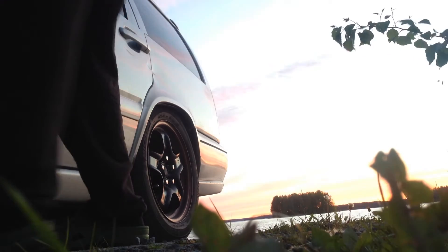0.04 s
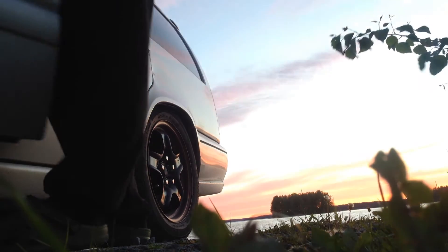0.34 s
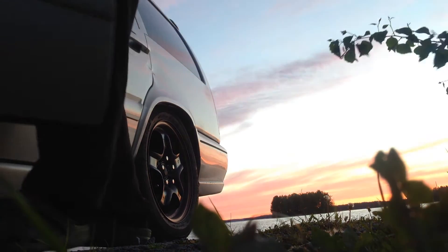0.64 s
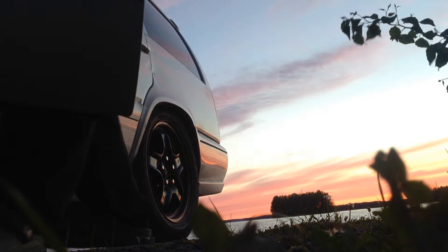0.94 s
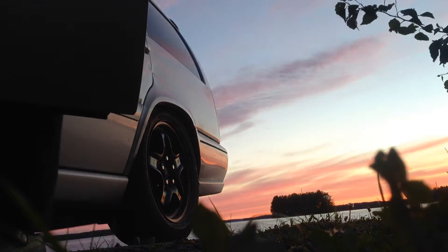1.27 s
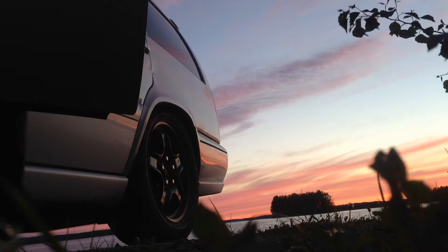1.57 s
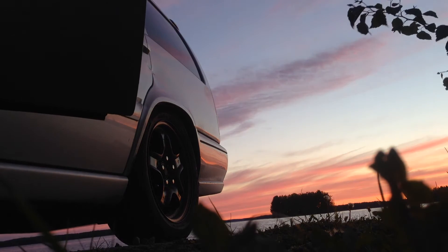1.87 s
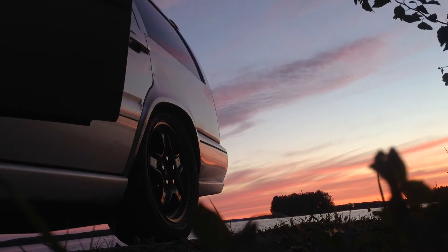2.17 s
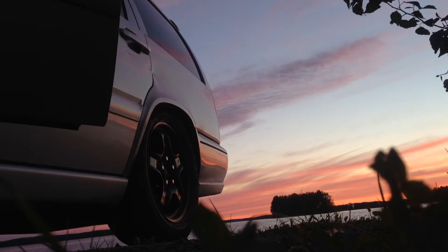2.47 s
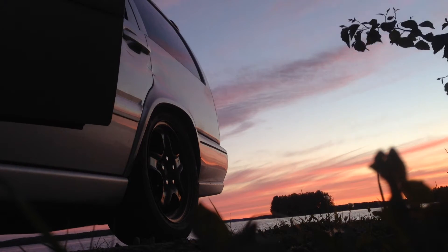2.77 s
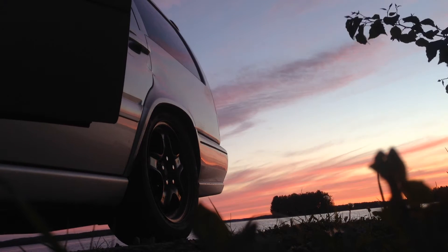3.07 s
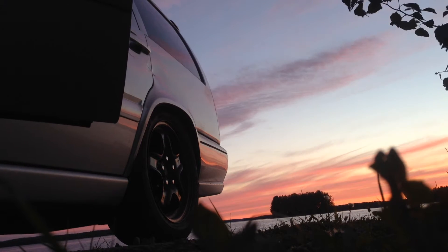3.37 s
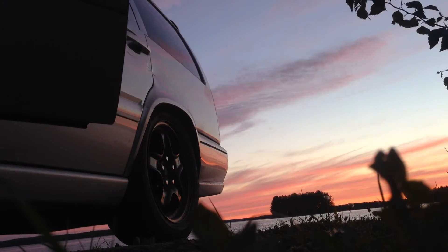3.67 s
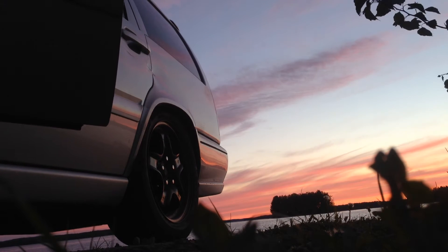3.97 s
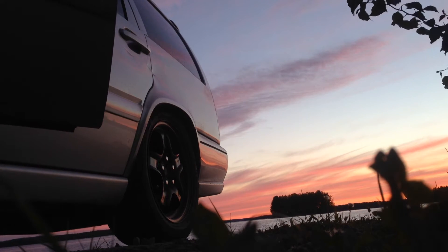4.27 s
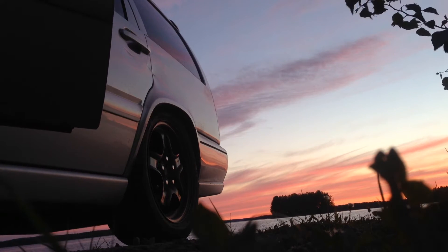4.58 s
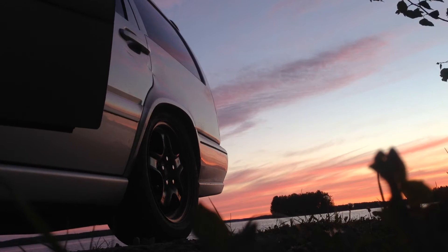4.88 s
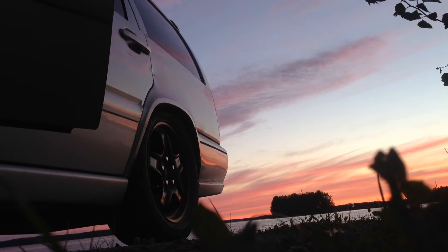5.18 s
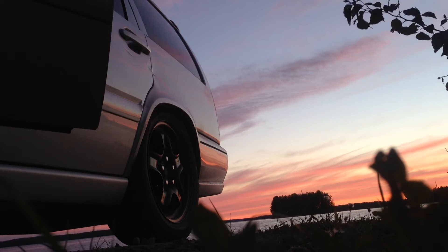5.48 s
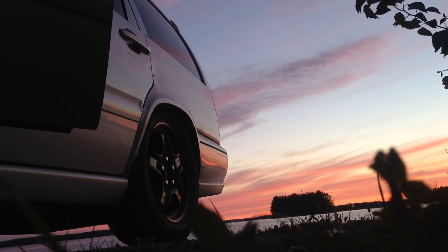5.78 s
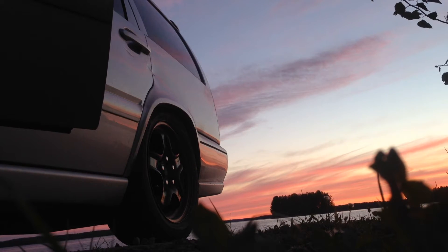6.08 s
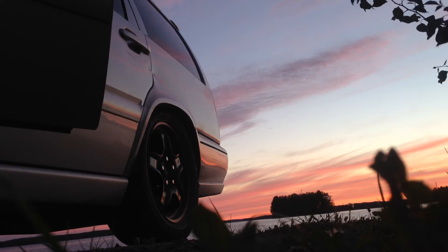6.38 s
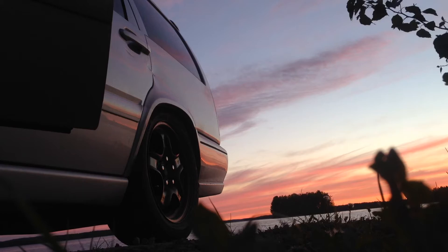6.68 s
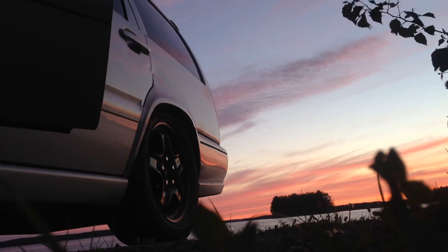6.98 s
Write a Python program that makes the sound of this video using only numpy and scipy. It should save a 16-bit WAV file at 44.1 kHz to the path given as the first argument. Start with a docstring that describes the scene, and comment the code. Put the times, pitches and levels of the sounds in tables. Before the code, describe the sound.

A diesel car idles outdoors with a low, uneven rumble and rattle, then is revved twice, the second time harder.

```python
"""A five-cylinder diesel car idles outdoors, heard from the ground beside it, and is revved twice.
The exhaust rumbles unevenly once a cycle and turns to a hard firing note under load.
Combustion knock, valve rattle and intake hiss ride on top, all following one crank and one pedal.
A few small clicks come from the door, over quiet outdoor air. Gain control ducks the loud revs."""
import sys
import numpy as np
from scipy import signal
from scipy.fft import rfft, irfft
from scipy.io import wavfile
from scipy.ndimage import uniform_filter1d

SR = 44100
rng = np.random.default_rng(int(sys.argv[2]) if len(sys.argv) > 2 else 0)


def put_to_file(sound):
    """Save the sound as 16-bit audio at rate SR, in the file named by the first command-line argument."""
    columns = np.atleast_2d(sound).T  # one column per channel
    safe = np.clip(columns, -1, 1)
    whole_steps = np.round(safe * 32767)
    wavfile.write(sys.argv[1], SR, whole_steps.astype(np.int16))


N = 310023
TIME = np.arange(N) / SR
CYLINDER_COUNT, IDLE_RPM = 5, 810


def gain_of(db):
    """Decibels to amplitude."""
    return 10 ** (np.asarray(db) / 20)


def unit_rms(x):
    """Scales to rms 1."""
    return x / np.sqrt(np.mean(x ** 2) + 1e-20)


def steadied(x, size=9001):
    """Scales to a running rms of 1, leaving the beat of single strokes."""
    power = uniform_filter1d(uniform_filter1d(x ** 2, size), size // 2)
    return x / np.sqrt(abs(power) + 1e-20)


def smoothed(x, lag_s):
    """One-pole lag."""
    keep = np.exp(-1 / (lag_s * SR))
    return signal.lfilter([1 - keep], [1, -keep], x)


def coloured(x, spectrum):
    """Minimum-phase filter through (Hz, dB) points, falling steeply above the last."""
    bins_hz = np.fft.rfftfreq(16384, 1 / SR)
    hz, db = np.transpose(spectrum)
    db = np.interp(np.log(bins_hz + 1), np.log(hz), db) - 40 * np.log2(np.maximum(bins_hz / hz[-1], 1))
    cepstrum = irfft(np.log(gain_of(np.maximum(db, -100))))
    cepstrum[1:len(bins_hz) - 1] *= 2
    cepstrum[len(bins_hz):] = 0
    response = irfft(np.exp(rfft(cepstrum)))[:len(bins_hz) // 2]
    return signal.oaconvolve(x, response)[:N]


def drift(hz, step=32):
    """Random wander of rms 1, rolling off near hz."""
    coarse = rng.standard_normal(N // step + 2)
    lowpass = np.exp(-(np.fft.rfftfreq(len(coarse), step / SR) / hz) ** 2)
    slow = irfft(rfft(coarse) * lowpass, len(coarse))
    return np.interp(np.arange(N) / step, np.arange(len(slow)), unit_rms(slow))


def decaying(clicks, t60_s):
    """Exponential tail after each click."""
    return signal.lfilter([1], [1, -np.exp(-np.log(1000) / (t60_s * SR))], clicks)


def ringing(clicks, modes):
    """Clicks strike modes given as (Hz, dB, t60 in s)."""
    t = TIME[:SR // 3]
    response = sum(gain_of(db - 60 * t / t60) * np.sin(2 * np.pi * hz * t) for hz, db, t60 in modes)
    return signal.oaconvolve(clicks, response)[:N]


def strokes(cycles, place):
    """One unit click each time the cycle passes this place."""
    return np.diff(np.floor(cycles - place), prepend=np.floor(cycles[0] - place))


def firings(cycles, lag=0):
    """One click train a cylinder, evenly spaced through the cycle."""
    return [strokes(cycles, k / CYLINDER_COUNT + lag) for k in range(CYLINDER_COUNT)]


# Crank speed. Each row: time in seconds, speed in rpm.
CRANK_SPEED = [(4.77, 809.9), (5.0, 937.9), (5.17, 981.1), (5.42, 1102.4), (5.76, 1723.6), (6.0, 1781.2),
               (6.37, 1646.6), (6.52, 2094.9), (6.7, 2770.1), (6.85, 2988.1), (7.03, 2920.8)]

def rpm():
    """Crank speed, at idle until the first row."""
    return np.interp(TIME, *np.transpose(CRANK_SPEED))


def crank_cycles():
    """Engine cycles (two turns each) done so far, with slight flutter."""
    return np.cumsum(rpm()) / SR / 120 - .015 + .0012 * drift(7)


# Pedal travel. Each row: time in seconds, throttle from 0 to 1.
PEDAL = [(4.77, 0.13), (4.87, 0.27), (5.24, 0.18), (5.4, 0.29), (5.54, 0.54), (5.68, 0.87), (5.76, 0.72),
         (5.85, 0.64), (5.92, 0.38), (6.29, 0.15), (6.36, 0.39), (6.41, 0.98), (6.66, 0.99), (6.8, 0.72),
         (7.03, 0.7)]

def throttle():
    """A light touch, a first rev, a lift, a hard second rev."""
    return np.interp(TIME, *np.transpose(PEDAL))


def effort(base_db, throttle_db, octave_db):
    """Gain law: base level, plus dB at full throttle, plus dB per doubling of idle speed."""
    return gain_of(base_db + throttle_db * throttle() + octave_db * np.log2(rpm() / IDLE_RPM))


# Outdoor air spectrum. Each row: frequency in Hz, relative level in dB.
AIR_SPECTRUM = [(20, -56), (60, -14), (150, 8.5), (400, -10.5), (1000, -0.5), (4000, -25.5), (15000, -84)]

def outdoor_air():
    """Quiet, steady, low noise."""
    return gain_of(-43) * unit_rms(coloured(rng.standard_normal(N), AIR_SPECTRUM))


# Door trim clicks. Each row: start in seconds, level in dB, centre in Hz, t60 in seconds.
DOOR_CLICKS = [(0.245, -46, 7000, 0.0064), (.311, -52, 5000, .05), (0.434, -46, 4000, .02),
               (1.598, -41, 4200, .07), (2.264, -48, 4500, 0.36), (2.298, -44, 5460, 0.08),
               (2.318, -41, 5340, 0.075), (3.444, -30.5, 4544, 0.0077), (4, -37, 3700, 0.011)]

def door_clicks():
    """Short dry ticks and scuffs of trim."""
    out = np.zeros(N)
    for start_s, db, hz, t60_s in DOOR_CLICKS:
        band = [(hz / 3, -14), (hz, 0), (hz * 2, -12), (hz * 4, -18)]
        noise = unit_rms(coloured(rng.standard_normal(N), band))
        fall_db = 60 * np.minimum(abs(TIME - start_s) / t60_s, 2)
        out += (TIME >= start_s) * gain_of(db - fall_db) * noise
    return out


def underbody_echoes(x, size=0.078, count=30):
    """Short echoes between underbody and ground ripple the spectrum."""
    taps = np.zeros(SR // 40)
    delays = rng.integers(40, len(taps), count)
    taps[delays] = size * rng.choice([-1, 1], count) * np.exp(-delays / len(taps))
    taps[0] = 1
    return signal.oaconvolve(x, taps / np.linalg.norm(taps))[:N]


# Intake spectrum. Each row: frequency in Hz, relative level in dB.
INTAKE_SPECTRUM = [(2180, -1), (3700, 5), (4370, -3), (5000, 0), (5560, 0.5), (6290, -0.5), (7170, -0.5),
                   (9460, -2), (12400, -10), (14300, -14), (15200, -21)]
# Gain law: base in dB, dB at full throttle, dB per speed octave.
INTAKE_GAIN = (-53, 9.2, 4.53)

def intake_hiss(cycles, revved, fast, off_idle_db=4, snort_db=4, snort_s=6.445, snort_width_s=0.024):
    """Intake air pulses, whistles faintly and snorts as the pedal is floored; injectors tick through."""
    beats = strokes(CYLINDER_COUNT * cycles, 0.44)
    ticks = decaying(beats * gain_of(4.8 * drift(40) - 27), .005)
    flow = 1 + 0.89 * decaying(beats, 0.089) + 1.5 * ticks
    air = steadied(coloured(flow * rng.standard_normal(N), INTAKE_SPECTRUM))
    air += 0.42 * revved * np.diff(air, prepend=0)  # faster air is brighter
    whistle_hz = 6330 + 950 * fast * throttle() ** 2
    whistle = unit_rms(drift(200) * np.cos(2 * np.pi * np.cumsum(whistle_hz) / SR))
    air += gain_of(-13 + 7 * throttle()) * whistle
    snort = np.exp(-((TIME - snort_s) / snort_width_s) ** 2)
    return effort(*INTAKE_GAIN) * gain_of(off_idle_db * revved + snort_db * snort + .5 * drift(56)) * air


# Valve spectra at low and high speed. Each row: frequency in Hz, relative level in dB.
VALVES_SLOW = [(1240, -36.5), (2100, -5), (2270, 1), (2470, 1.5), (2610, 6), (2870, 2.5), (3260, 0.5),
               (3470, -0.5), (3560, -21), (4000, -14), (5200, -47), (8800, -120)]
VALVES_FAST = [(1240, -32), (2100, -4.5), (2280, -3.5), (3060, -2), (4000, -22.5), (5200, -33),
               (8800, -120)]
# Valve cover modes. Each row: frequency in Hz, relative level in dB, t60 in seconds.
COVER_RING = [(2534, 11, 0.039), (2600, -18, 0.018), (2562, -8, .04), (2980, 4, 0.023)]
# Gain law: base in dB, dB at full throttle, dB per speed octave.
VALVE_GAIN = (-44, 11.6, 5.7)

def valve_rattle(cycles, fast):
    """Valves and injection pump chatter ten times a cycle and ring the valve cover."""
    taps = strokes(2 * CYLINDER_COUNT * cycles, 0.11) * gain_of(4.9 * np.minimum(drift(115), 2))
    chatter = (0.98 + decaying(taps, 0.028)) * rng.standard_normal(N)
    cover = gain_of(-3) * unit_rms(ringing(chatter, COVER_RING))
    low_speed = unit_rms(coloured(chatter, VALVES_SLOW)) + cover
    high_speed = unit_rms(coloured(chatter, VALVES_FAST))
    return effort(*VALVE_GAIN) * steadied((1 - fast) * low_speed + fast * high_speed)


# Cylinder strengths, also used by the exhaust. Each row: exhaust pulse, knock, injector ping, in dB.
CYLINDER_DB = [(-7.5, 5, -10.5), (-25, 1, -9), (-10.5, 3.5, -10.5), (0.5, 5.5, -25), (-1.5, 0.5, -3.5)]
# Block spectra at idle and revved. Each row: frequency in Hz, relative level in dB.
BLOCK_IDLE = [(250, -6.5), (430, -25), (452, -5), (478, -15), (523, -3.5), (797, -8.5), (820, -12.5),
              (892, -9.5), (944, -2.5), (1090, -12.5), (1210, -9.5), (1410, -4), (1740, -8), (1930, -8.5),
              (2300, -14), (2990, -23), (5060, -120)]
BLOCK_REVVED = [(260, -23.5), (450, 0), (560, -2.5), (620, -5.5), (843, -7), (973, -3), (1090, -7),
                (1310, -2), (1560, -7.5), (1870, -4.5), (2300, -16.5), (2990, -59), (5060, -120)]
# Block modes. Each row: frequency in Hz, relative level in dB, t60 in seconds.
BLOCK_RING = [(844, -17, .4), (977, -8, .12), (1182, -9, .12), (1687, -7, .12), (2050, -13, .1)]
# Gain law: base in dB, dB at full throttle, dB per speed octave.
KNOCK_GAIN = (-38, 10.3, 5.2)

def combustion_knock(cycles, revved, clack_rise_s=0.002, clack_t60_s=0.081):
    """Each ignition strikes the block: rough burst, the cylinder's own clack, injector ping, ringing."""
    _, knock_sizes, ping_sizes = gain_of(CYLINDER_DB).T
    trains = np.array([train * gain_of(.7 * drift(20)) for train in firings(cycles, lag=.1)])
    blows, pings = knock_sizes @ trains, ping_sizes @ trains
    t = TIME[:SR // 20]
    envelope = gain_of(-60 * t / clack_t60_s) * (1 - np.exp(-t / clack_rise_s))
    clacks = sum(size * signal.oaconvolve(train, envelope * rng.standard_normal(len(t)))[:N]
                 for size, train in zip(knock_sizes, trains))
    burst = (1 + 2 * uniform_filter1d(decaying(blows, 0.21), size=240)) * rng.standard_normal(N)
    # two coupled modes: the ping swells briefly
    ping = ringing(ringing(pings, [(1198, 0, 0.018)]), [(1142, 0, 0.0095)])
    idle = gain_of(-3) * steadied(coloured(burst, BLOCK_IDLE))
    idle += gain_of(-8) * steadied(coloured(clacks, BLOCK_IDLE))
    idle += gain_of(-8.5 + 0.99 * drift(8.3)) * steadied(ping)
    loaded = steadied(coloured(unit_rms(burst) + 0.41 * unit_rms(clacks), BLOCK_REVVED))
    ring = gain_of(-7 - 7.1 * revved) * steadied(ringing(blows, BLOCK_RING))
    return effort(*KNOCK_GAIN) * (np.sqrt(1 - revved) * idle + revved * loaded + ring)


# Pipe and tailpipe rasp spectra. Each row: frequency in Hz, relative level in dB.
PIPE_SPECTRUM = [(20, -47), (48, -13), (72, -15), (110, -2), (150, -6.5), (180, 6.5), (220, -1),
                 (250, -1.5), (282, 3.5), (345, -3), (395, -2.5), (440, -18.5), (530, -15), (700, -25),
                 (1100, -40.5)]
RASP_SPECTRUM = [(150, -39), (300, -22), (395, -1.5), (450, -8.5), (530, -4), (720, -20), (1100, -29)]
# Echoes in the pipe. Each row: delay in seconds, signed gain.
PIPE_TAPS = [(0, .7), (.0021, -.55), (.0048, .35), (.0074, .5), (.0098, .3), (.0138, -.15)]
# Gain law: base in dB, dB at full throttle, dB per speed octave.
THROB_GAIN = (-32.5, 12.06, 6.8)

def exhaust_throb(cycles, revved, fast, surge_depth=0.71, surge_above_rpm=1630):
    """Unequal pulses with puffs of turbulent gas ring the pipe; at high speed throb gives way to rasp."""
    drive = np.sqrt(revved)
    trains, sizes = np.array(firings(cycles)), gain_of(CYLINDER_DB)[:, 0]
    pulses = sizes @ trains
    # only what differs between cylinders throbs
    uneven = (pulses - sizes.mean() * sum(trains)) * gain_of(drift(15))
    burr = sum(size * np.interp(TIME - delay_s, TIME, uneven) for delay_s, size in PIPE_TAPS)
    gas = (.35 - 0.067 * drive + decaying(pulses, 0.19)) * rng.standard_normal(N)
    # the gas flow surges once a cycle
    surge = 1 + surge_depth * (rpm() > surge_above_rpm) * np.cos(2 * np.pi * (cycles - .76))
    throb = drive * gain_of(-5.5 * fast) * steadied(coloured(burr * surge, PIPE_SPECTRUM))
    rasp = drive * gain_of(-14.5 + 9 * fast) * steadied(coloured(burr, RASP_SPECTRUM))
    puffs = gain_of(-9) * steadied(coloured(gas, PIPE_SPECTRUM))
    return effort(*THROB_GAIN) * (throb + rasp + puffs)


# Firing harmonics, lowest first. Each row: base level in dB, dB added at full throttle.
FIRING_HARMONICS = [(-46, 19), (-43, 20.5), (-43.5, 14), (-44, 11), (-47, 8)]
# Silencer response. Each row: frequency in Hz, gain in dB.
SILENCER_RESPONSE = [(35, -10), (60, 6), (75, 5.5), (110, 6.5), (130, 6.5), (155, -6), (205, 5.5), (255, 5),
                     (300, 7), (350, -0.5), (400, 2), (490, -3), (600, -12)]

def firing_note(cycles, octave_db=4.5, waver_db=3.9):
    """Off idle the five pulses merge into a hard note, its overtones coloured and delayed by the pipe."""
    speed_rpm = rpm()
    firing_hz = CYLINDER_COUNT * speed_rpm / 120
    hz, db = np.transpose(SILENCER_RESPONSE)
    note = np.zeros(N)
    for k, (base_db, throttle_db) in enumerate(FIRING_HARMONICS, 1):
        silencer = gain_of(np.interp(np.log(k * firing_hz), np.log(hz), db))
        waver = gain_of(waver_db * drift(19) * IDLE_RPM / speed_rpm)
        phase = 2 * np.pi * CYLINDER_COUNT * k * (cycles - .02) + .6 * (k - 1) ** 2
        note -= np.sqrt(2) * effort(base_db, throttle_db, octave_db) * silencer * waver * np.cos(phase)
    off_idle = np.clip((speed_rpm - IDLE_RPM) / 50, 0, 1)
    return off_idle * note


# Exhaust resonances at idle. Each row: centre in Hz, width in Hz, level in dB.
PIPE_RESONANCES = [(72, 20, -57), (108.6, 42, -46), (140.8, 8.1, -44), (167.5, 23, -62), (209, 40, -46.5),
                   (250.4, 5.3, -54.5), (277.4, 8, -44), (283, 22, -49), (326.4, 12, -49.5),
                   (374.8, 19.3, -54.5), (395, 6.6, -53.5), (439, 17, -57.5)]
# Arrival at the tailpipe. Each row: frequency in Hz, delay in cycles.
PIPE_DELAY = [(140, .78), (155, .64), (235, .64), (250, .34)]

def idle_rumble(cycles, revved, firing_boost_db=3.5, throttle_db=7.5):
    """Orders of the cycle ring the pipe; it lets the low ones out last, so the idle lopes."""
    orders = np.arange(5, 68)
    order_hz = orders * IDLE_RPM / 120
    pipe = sum(gain_of(db) / (1 + (2 * (order_hz - hz) / width) ** 2) for hz, width, db in PIPE_RESONANCES)
    sizes = pipe * gain_of(firing_boost_db * (orders % CYLINDER_COUNT == 0))
    delays = np.interp(order_hz, *np.transpose(PIPE_DELAY))
    phases = -2 * np.pi * np.cumsum(delays) + 1.1 * rng.standard_normal(len(orders))
    place = np.linspace(0, 1, 2048)
    one_cycle = np.sqrt(2) * sizes @ np.cos(2 * np.pi * np.outer(orders, place) + phases[:, None])
    level = np.sqrt(1 - revved) * gain_of(throttle_db * throttle() + 0.03 * drift(29))
    return level * np.interp(cycles % 1, place, one_cycle)


def scene(door_open_s=1.33, door_swing_s=.15):
    """One crank drives all engine layers; the door shields rattle and hiss until it has swung open."""
    cycles = crank_cycles()
    revved = np.clip((rpm() - 815) / 230, 0, 1)
    fast = np.clip((rpm() - 1700) / 450, 0, 1)
    shut = np.clip((door_open_s - TIME) / door_swing_s, 0, 1)
    exhaust = idle_rumble(cycles, revved) + firing_note(cycles) + exhaust_throb(cycles, revved, fast)
    rattle = gain_of(-5.5 * shut) * valve_rattle(cycles, fast)
    hiss = gain_of(-1.5 * shut) * intake_hiss(cycles, revved, fast)
    air = outdoor_air()
    knock = combustion_knock(cycles, revved)
    return (air + underbody_echoes(rattle + hiss) + door_clicks() + knock + exhaust)[None]


def record(dry):
    """Gain control ducks the loud revs and recovers slowly; a low-pass limits the band."""
    threshold_db, squeeze, recovery_db_per_s = -15, 0.98, 4
    sense_s, react_s, cutoff_hz = 0.047, 0.042, 15330
    level_db = 10 * np.log10(smoothed(dry[0] ** 2, sense_s) + 1e-12)
    recovery_db = recovery_db_per_s * TIME
    held_db = np.maximum.accumulate(level_db + recovery_db) - recovery_db
    over_db = np.maximum(held_db - threshold_db, 0)
    ducked = dry * gain_of(-squeeze * smoothed(over_db, react_s))
    lowpass = signal.firwin(511, cutoff_hz, window=("kaiser", 9), fs=SR)
    return signal.oaconvolve(ducked, lowpass[None], "same")


dry = scene()
out = record(dry)
put_to_file(out)
```